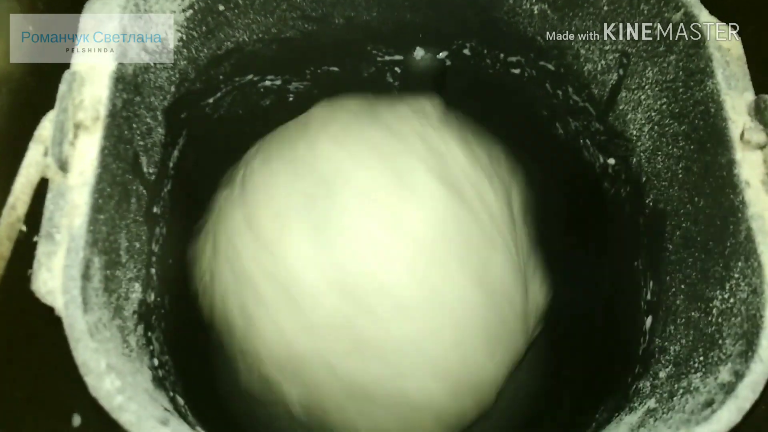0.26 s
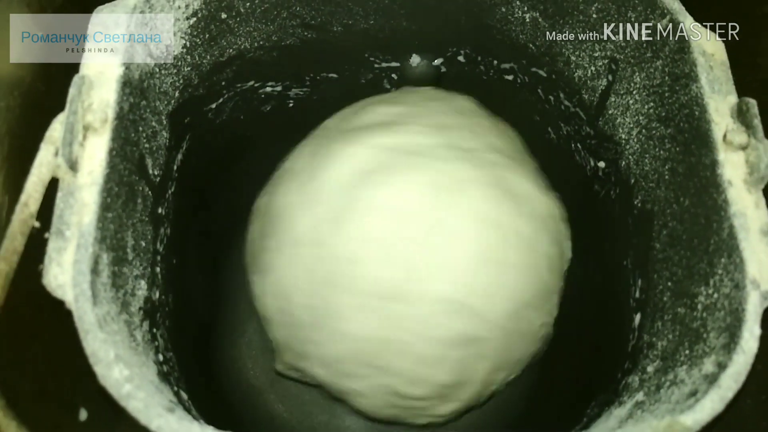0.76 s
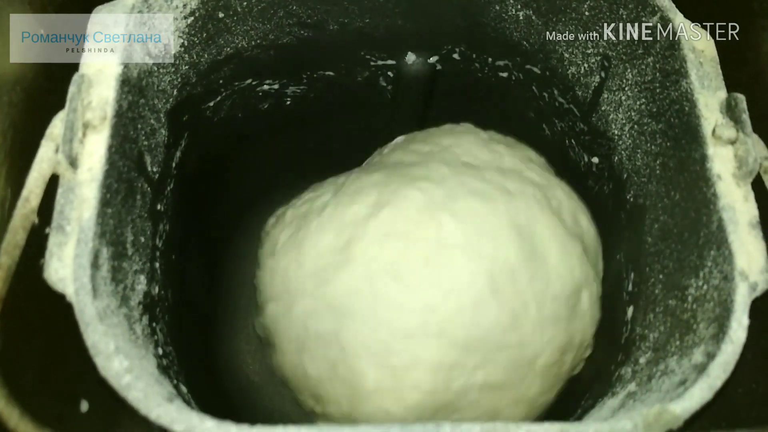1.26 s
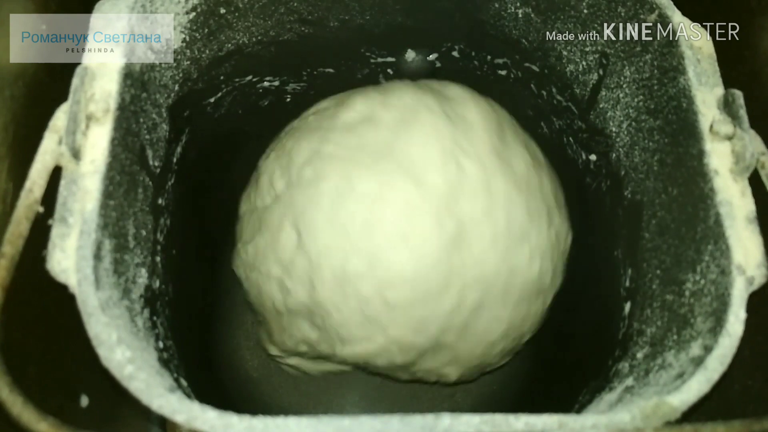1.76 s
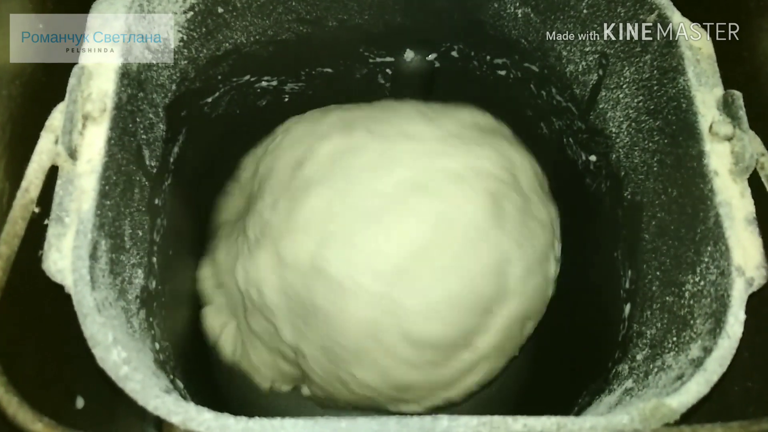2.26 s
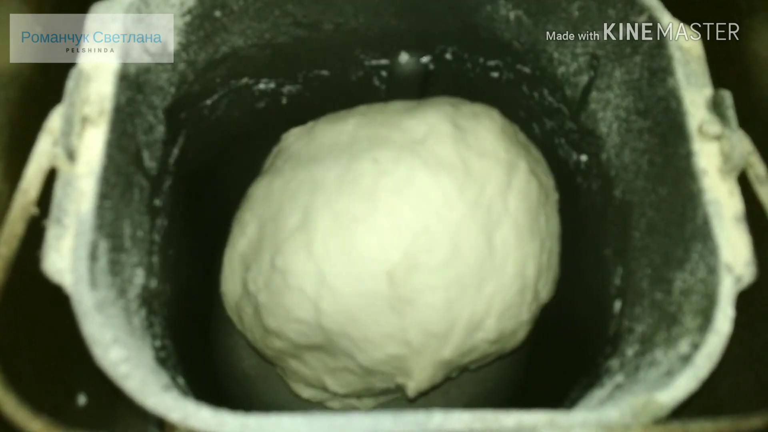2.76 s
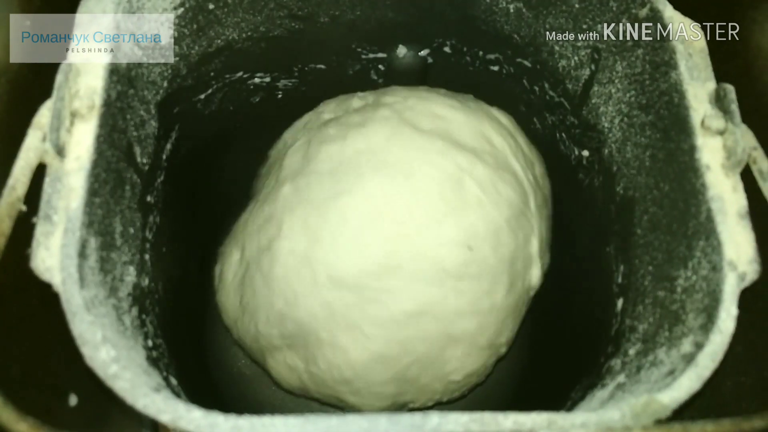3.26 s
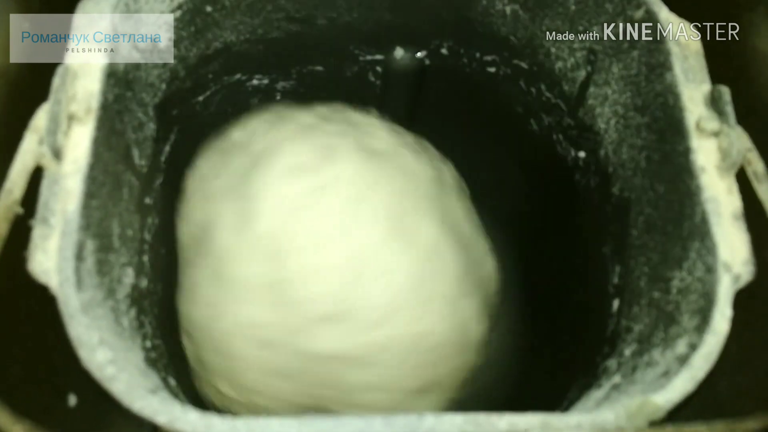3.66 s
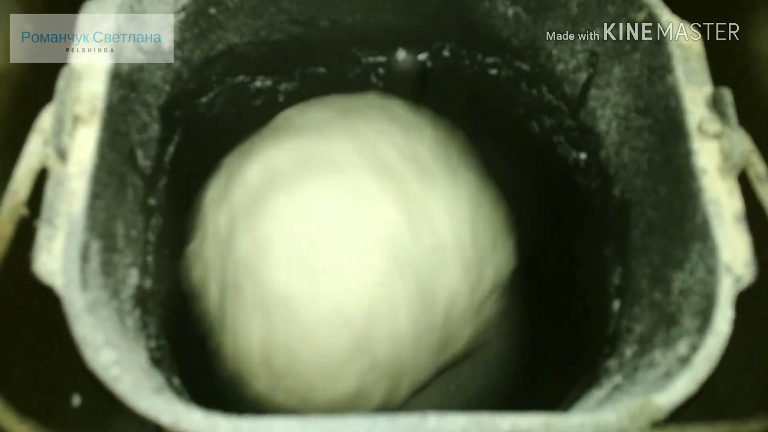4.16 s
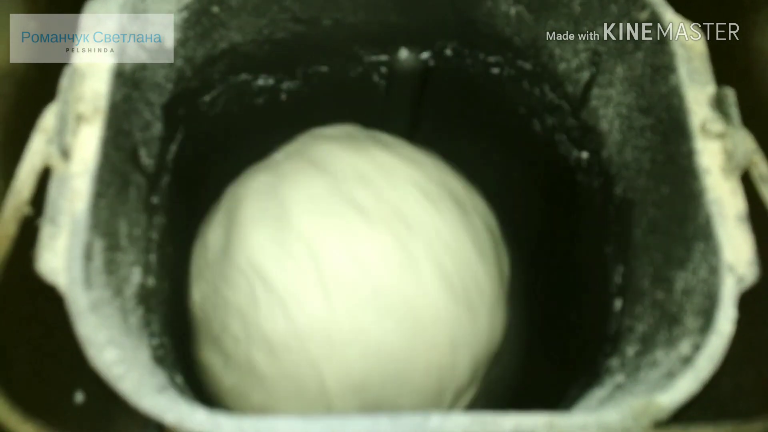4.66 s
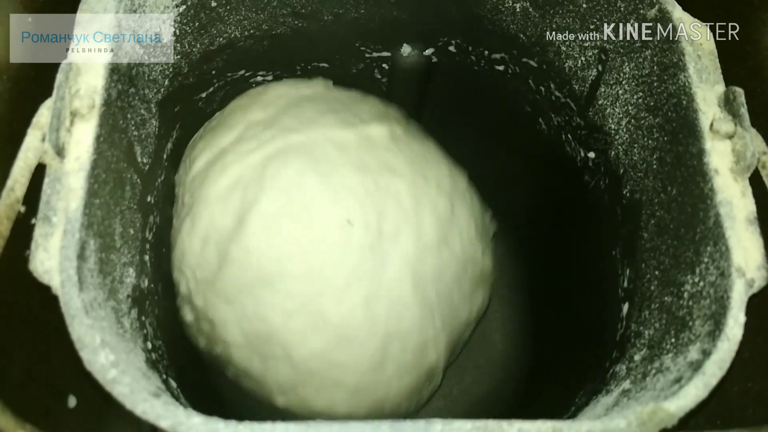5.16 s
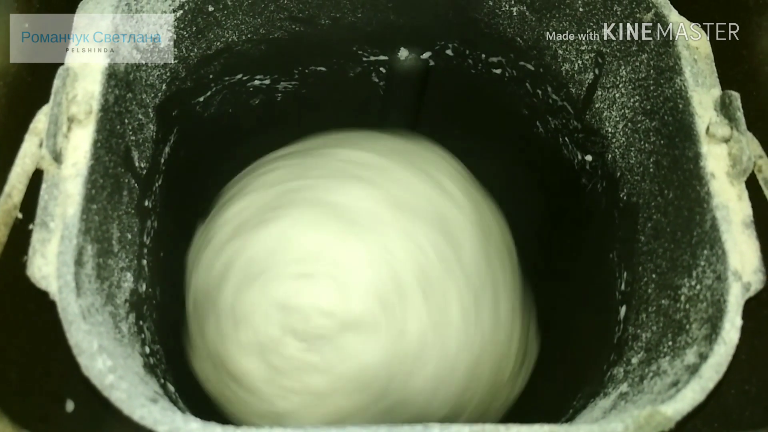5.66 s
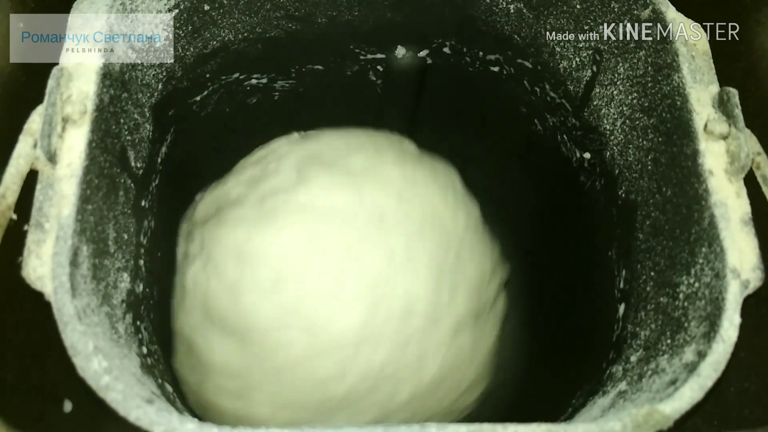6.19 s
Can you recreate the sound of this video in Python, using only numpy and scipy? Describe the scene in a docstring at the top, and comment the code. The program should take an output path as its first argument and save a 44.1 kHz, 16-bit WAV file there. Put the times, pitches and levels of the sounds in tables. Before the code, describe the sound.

A bread machine kneads dough for about six and a half seconds, heard just above its open pan in a small room. A low electric hum and drone run throughout over a faint rush of air, swelling and sagging a few times a second as the paddle pushes. The sticky ball rubs, crackles faintly and slaps softly against the metal wall, with a boomy rumble from the housing and short squeaks from the drive. At about 0.7 seconds comes a cluster of paddle clinks and dull knocks, with more knocks around 1 second. Between 2.1 and 3.4 seconds the tumbling eases three times while the motor hums on. The paddle clinks again at 3.5 seconds. From 4 seconds to the end it is busier: the pan thuds irregularly in its seat, with wet slaps, ticks, brief chirps and stronger motor surges.

```python
"""A motor hum swells and sags: a bread machine kneads dough, heard above its open pan in a small room.
Each push of the paddle loads the mains motor; belt and drive excite the resonances of the housing.
The drive chirps by stick-slip, the pan knocks in its seat and the loose paddle clinks on its shaft.
Between pushes the sticky ball slaps the wall, peels and slips along it; three times it lies still."""
import sys
import numpy as np
from scipy import signal
from scipy.fft import rfft, irfft, next_fast_len
from scipy.io import wavfile

SR = 44100
rng = np.random.default_rng(int(sys.argv[2]) if len(sys.argv) > 2 else 0)


def wav_out(sig):
    """Save sig, one row per channel (or a flat mono array), as 16-bit PCM at SR to the path in sys.argv[1]."""
    wavfile.write(sys.argv[1], SR, np.round(np.clip(np.atleast_2d(sig).T, -1, 1) * 32767).astype(np.int16))


N = 283563
TIME = np.arange(N) / SR
SLOW_TIME = TIME[::40]


def from_db(db):
    """Amplitude ratio of a level in decibels."""
    return 10 ** (np.asarray(db) / 20)


def rms_one(x):
    """Normalisation to unit power."""
    return x / np.sqrt(np.mean(x ** 2) + 1e-20)


def lasting(x, length_s):
    """Normalisation to the energy of unit power held for length_s."""
    return x / np.sqrt(np.sum(x ** 2) / (length_s * SR) + 1e-20)


def balance(left_db):
    """Level difference: two channel gains, the left higher by left_db."""
    return from_db(np.array([[.5], [-.5]]) * left_db)


def spread(left, right, alike):
    """Partial coherence: two independent sounds mix into a stereo pair of correlation alike."""
    mid = np.sqrt(1 + alike) * (left + right)
    side = np.sqrt(1 - alike) * (left - right)
    return (mid + side * [[1], [-1]]) / 2


def add(track, s, sound):
    """Superposition of a short sound on a track, from s seconds."""
    i = max(round(s * SR), 0)
    track[..., i:i + sound.shape[-1]] += sound[..., :max(N - i, 0)]


def swell(s, rise_s, fall_s):
    """Gaussian envelope on SLOW_TIME, peaking at 1 at s seconds."""
    age = SLOW_TIME - s
    return np.exp(-(age / np.where(age < 0, rise_s, fall_s)) ** 2)


def drift(rate_hz):
    """Random modulation: noise of rms 1, low-passed at rate_hz."""
    r = np.exp(-40 * np.pi * rate_hz / SR)
    slow = signal.lfilter([1], [1, -2 * r, r * r], rng.standard_normal(N // 20 + 4002))[4000:]
    return np.interp(np.arange(N) / 20, np.arange(len(slow)), rms_one(slow))


def grains(per_s, spread_db):
    """Shot noise: tiny contacts at random moments, of uneven size and either sign."""
    sizes = from_db(spread_db * np.minimum(rng.exponential(1, N), 4)) * rng.choice([-1, 1], N)
    return rms_one(sizes * (rng.random(N) < per_s / SR))


def tone(hz, lead=0):
    """Phase as the integral of frequency: a sine of rms 1, ahead on the left by lead radians."""
    cycles = np.cumsum(hz + np.zeros(N)) / SR + rng.random()
    return np.sqrt(2) * np.sin(2 * np.pi * cycles + lead * np.array([[.5], [-.5]]))


def resonate(x, hz, width_hz):
    """Damped resonator with unit gain at its peak."""
    r = np.exp(-np.pi * width_hz / SR)
    feedback = [1, -2 * r * np.cos(2 * np.pi * hz / SR), r * r]
    return signal.lfilter(np.array([1, 0, -1]) * (1 - r * r) / 2, feedback, x + 1e-18)


def sing(force, hz, width_hz):
    """Time-varying resonator: steep-sided, its frequency free to move while it rings."""
    turn = np.exp(2j * np.pi * np.cumsum(hz) / SR)
    poles = np.exp(-np.pi * width_hz * np.array([1, 4]) / SR)
    return np.real(turn * signal.lfilter([1], np.poly(poles), force / turn))


def colour(x, spectrum):
    """Spectral shaping to rms 1, rolling off below the spectrum's first point."""
    hz, db = np.transpose(spectrum)
    size = next_fast_len(N)
    f = np.arange(size // 2 + 1) * SR / size + 1e-3
    gain = from_db(np.interp(np.log(f), np.log(hz), db)) / (1 + (hz[0] / f) ** 4)
    return rms_one(irfft(rfft(x, size) * gain, size)[..., :N])


# The rush of cooling air. Each row: frequency in Hz, relative spectral density in dB.
AIR_SPECTRUM = [(30, -10), (70, -34), (150, 13), (400, 2), (850, -58), (1250, 7), (2000, -22), (2600, -1),
                (4000, -45), (15000, -45)]

def cooling_air(level_db=-59.5):
    """Broadband flow noise: a soft, steady rush."""
    return from_db(level_db) * colour(spread(*rng.standard_normal((2, N)), alike=0.23), AIR_SPECTRUM)


def room(x, t60_s=0.083, wall_hz=5500):
    """Reverberation: a short, dull, exponential tail of reflections, different at each ear."""
    t = np.arange(SR // 2) / SR
    tail = rng.standard_normal((2, len(t))) * from_db(-60 * t / t60_s) * (t > .003)
    tail = signal.sosfilt(signal.butter(1, wall_hz, fs=SR, output="sos"), tail)
    return signal.fftconvolve(x, tail / np.sqrt(np.sum(tail ** 2) / 2), axes=1)[:, :N]


# Modes of the housing. Each row: frequency in Hz, bandwidth in Hz, relative gain in dB.
HOUSING_MODES = [(49.6, 8.6, -9.5), (125.5, 2.4, 2.5), (216.3, 12.7, 8), (285.6, 17.8, 6), (328, 73, 0),
                 (415, 46.5, 4.5), (442.6, 37.5, 3.5), (505.2, 40, -1), (653, 38, -9.5), (705, 5.8, -6),
                 (890, 46, -8)]

def housing(force):
    """Modal response of the boomy case, neighbouring modes opposite in sign."""
    return sum((-1) ** k * from_db(db) * resonate(force, hz, width)
               for k, (hz, width, db) in enumerate(HOUSING_MODES))


# Modes of the pan. Each row: frequency in Hz, relative gain in dB, time to decay by 60 dB
# in seconds, excess of left over right in dB.
PAN_MODES = [(1270, -6.5, 0.016, -23), (1255, -1.5, 0.02, 0), (1551, 2, 0.031, 6), (1677, -5, 0.033, -6),
             (1990, -11, 0.14, 14), (2290, -3.5, 0.035, 16), (2500, -13, 0.02, 17),
             (2690, -13, 0.012, 23.5), (3180, -12.5, 0.056, 32), (3470, -9, 0.18, 6), (4750, -16, 0.12, 21),
             (4980, -13, 0.093, 19), (6310, -5.5, 0.087, 20), (10430, -2.5, 0.025, -16)]

def pan_ring(force):
    """Modal response of the metal pan, damped by the dough inside it."""
    return sum(from_db(db) * balance(left_db) * resonate(force, hz, np.log(1000) / np.pi / t60)
               for hz, db, t60, left_db in PAN_MODES)


def drive_rumble(rumble_db, boom_db=4.0, lump_db=1.5, top_hz=750):
    """Structure-borne sound: belt teeth and bearings jolt the case, which shuts in their treble."""
    force = spread(grains(1000, 1.0), grains(1000, 3.7), alike=0.94) * from_db(lump_db * drift(28))
    boom = signal.sosfilt(signal.cheby1(6, .5, top_hz, fs=SR, output="sos"), housing(force))
    return from_db(rumble_db + boom_db) * rms_one(boom) * balance(-1.9)


# Chirps of the drive. Each row: centre in seconds, pitch in Hz, level in dB before the trim,
# length in seconds.
DRIVE_CHIRPS = [(0.351, 1276, -46, 0.034), (0.765, 1830, -56, 0.14), (1.006, 1200, -55, .03),
                (2.53, 1233, -46, 0.036), (3.125, 1250, -48.5, 0.03), (3.555, 1970, -48, 0.067),
                (4.023, 1200, -48, 0.048), (4.14, 1280, -47, 0.017), (4.315, 1230, -47, 0.025),
                (4.395, 1180, -47, 0.041), (4.453, 1240, -44.5, 0.027), (4.573, 1400, -49.5, .05),
                (4.788, 1260, -52.5, 0.044), (5.208, 1545, -50, 0.03), (5.394, 1370, -45, 0.012),
                (5.621, 2450, -52, 0.06), (5.88, 1512, -45, 0.053)]

def drive_chirps(width_hz=100, slips_per_s=900, glide=0.035, rasp_db=-11.5, trim_db=-3.9):
    """Stick-slip friction excites a resonance that bends up or down; the pan rasps along."""
    out, t = np.zeros((2, N)), np.arange(-SR // 12, SR // 12) / SR
    ring_delay_s = 1 / (np.pi * width_hz)
    for s, hz, db, length_s in DRIVE_CHIRPS:
        slips = rng.standard_normal(len(t)) * ((rng.random(len(t)) < slips_per_s / SR) + 0.29)
        slips *= np.exp(-2 * (2 * t / length_s) ** 2)
        bend = glide * rng.uniform(-1.9, 1) * np.tanh(2 * t / length_s)
        song = lasting(sing(slips, hz * (1 + bend), width_hz), length_s / 2)
        rasp = lasting(pan_ring(resonate(slips, hz, hz)), length_s)
        add(out, s + t[0] - ring_delay_s, from_db(db + trim_db) * (song + from_db(rasp_db) * rasp))
    return out * balance(-1.2)


# The paddle pushes the ball round. Each row: peak in seconds, rise of the buzz in seconds,
# added buzz in dB, rotor load in dB.
PADDLE_PUSHES = [(-0.004, 0.016, -40, -36), (0.141, 0.052, -38.5, -42), (0.308, 0.059, -39, -37.5),
                 (0.445, 0.038, -39, -41), (0.57, 0.067, -39.5, -37.5), (0.73, 0.037, -37, -41),
                 (0.888, 0.06, -39, -37), (1.059, 0.089, -40, -42.5), (1.366, 0.055, -35.5, -40),
                 (1.656, 0.024, -35, -42), (1.749, 0.069, -40.5, -38), (2.07, 0.075, -38, -41),
                 (2.512, 0.07, -40.5, -41.5), (3.068, 0.062, -39.5, -41), (3.584, 0.077, -38, -36.5),
                 (3.946, 0.054, -39, -36), (4.089, 0.057, -46, -42.5), (4.233, 0.063, -39.5, -39),
                 (4.367, 0.051, -47, -52), (4.561, 0.05, -37, -33), (4.891, 0.046, -34.5, -35),
                 (5.202, 0.043, -33.5, -35), (5.545, 0.038, -35.5, -34), (5.641, 0.014, -40, -53.5),
                 (5.865, 0.063, -37.5, -32.5), (6.14, 0.048, -38.5, -37), (6.433, 0.024, -35, -36)]

def paddle_pushes(release_ratio=1.98, load_stretch=1.29):
    """Superposed pushes give envelopes of mains buzz and rotor load, slower to fade than to build."""
    buzz, load = 0, 0
    for s, rise_s, buzz_db, load_db in PADDLE_PUSHES:
        fall_s = release_ratio * rise_s
        buzz += from_db(buzz_db) * swell(s, rise_s, fall_s)
        load += from_db(load_db) * swell(s, load_stretch * rise_s, load_stretch * fall_s)
    return np.interp(TIME, SLOW_TIME, buzz), np.interp(TIME, SLOW_TIME, load)


# The throb of the belt. Each row: time in seconds, level in dB before the trim.
BELT_LEVELS = [(0.0, -59), (0.2, -39), (0.32, -64), (0.48, -48), (0.66, -49), (0.85, -44), (1.2, -53),
               (2.1, -57), (2.3, -67), (3.35, -76), (3.67, -52), (4.2, -58), (4.35, -60), (5.2, -57),
               (6.43, -60)]
# Harmonics of the mains buzz. Each row: multiple of the buzz frequency, level in dB.
MAINS_HARMONICS = [(3, -51), (4, -71.5), (5, -69.5), (6, -69.5), (7, -73), (13, -79), (19, -83)]
# Overtones of the rotor. Each row: multiple of the drone frequency, level in dB relative to the load.
ROTOR_OVERTONES = [(3 / 2, -22), (2, -18.5)]
# The ball lets go of the paddle. Each row: time in seconds, dip of the drone in dB,
# half length in seconds.
RELEASES = [(0.394, 9, 0.017), (0.658, 11.5, 0.019), (0.787, 5.5, 0.031), (0.971, 16.5, .018),
            (1.168, 16, 0.029), (1.44, 14, 0.03), (1.84, 7, 0.034), (2.154, 4.5, 0.029), (2.582, 13, 0.024),
            (2.786, 1.5, 0.05), (3.154, 8, 0.025), (3.76, 6, 0.016), (3.832, 4.5, 0.012),
            (4.017, 8.5, 0.025), (4.144, 9.5, 0.017), (4.335, 7.5, 0.024), (4.624, 4, 0.016),
            (4.754, 12, 0.026), (5.086, 11, 0.027), (5.43, 3.5, 0.038), (5.714, 7.5, .025),
            (6.336, 3, 0.029)]
BUZZ_HZ, BELT_HZ, IDLE_BUZZ_DB, IDLE_DRONE_DB = 100, 150.8, -53, -44
IDLE_HZ, SAG_HZ, FULL_LOAD_DB, SAG_LAG_S = 198.9, 5.5, -33, 0.029  # the drone: four cycles a turn

def motor(push_buzz, load, trim_db=-2.0, race_hz_per_db=0.3, waver_hz=0.6,
          flutter_db=1.5, shake_db=-2.5, throb_db=1.66):
    """Forced vibration: the buzz is locked to the mains; under load the rotor slows and drones louder."""
    effort = np.interp(TIME - SAG_LAG_S, TIME, load) / from_db(FULL_LOAD_DB)
    unrest = np.minimum(0.16 + 2 * effort, 1)  # unloaded, the motor runs almost evenly
    dip_db = np.interp(TIME, SLOW_TIME, sum(db * swell(s, half_s, half_s) for s, db, half_s in RELEASES))
    race_hz = race_hz_per_db * dip_db  # freed of the ball, the rotor runs a little faster
    drone_hz = IDLE_HZ - SAG_HZ * effort + race_hz + waver_hz * unrest * drift(25.0)
    buzz_gain = (from_db(IDLE_BUZZ_DB) + push_buzz) * from_db(flutter_db * unrest * drift(23))
    buzz = buzz_gain * tone(BUZZ_HZ, lead=0.43 + 0.12 * drift(5.4))
    harmonics = sum(from_db(db + shake_db * unrest * drift(4.3)) * tone(k * BUZZ_HZ)
                    for k, db in MAINS_HARMONICS)
    drone_gain = from_db(IDLE_DRONE_DB) + from_db(trim_db) * load
    drone_gain *= from_db(throb_db * unrest * drift(7.4) - dip_db)
    drone = drone_gain * tone(drone_hz, lead=-.15 + 0.43 * drift(4.2))
    growl = sum(load * from_db(db + 3.1 * drift(29)) * tone(k * drone_hz) for k, db in ROTOR_OVERTONES)
    belt_db = np.interp(TIME, *np.transpose(BELT_LEVELS)) + trim_db + 3.4 * drift(2.5)
    belt = from_db(belt_db) * tone(BELT_HZ + 2.3 * drift(16.0))
    return (buzz + drone) * balance(0.95) + (harmonics + growl + belt) * balance(0.033)


# The pan knocks in its seat. Each row: start in seconds, level in dB before the trim, pitch in Hz.
PAN_KNOCKS = [(0.738, -34, 514), (0.772, -37, 409), (0.989, -38, 398), (1.048, -39, 487), (1.601, -37, 466),
              (2.442, -36, 436), (3.505, -39, 380), (3.541, -35, 409), (4.074, -30, 482), (4.158, -40, 396),
              (4.309, -33.5, 452), (4.714, -33, 409), (4.77, -33, 415), (4.837, -31, 398),
              (5.034, -32, 490), (5.2, -37.5, 455), (5.4, -34.5, 406), (5.726, -31.5, 409),
              (5.809, -31.5, 398), (6.13, -34, 444), (6.281, -35.5, 463)]

def pan_knocks(trim_db=-1.5, squash_s=0.0017, boom_db=-3.0):
    """Soft impact: the ball rocks the pan, giving a thud of a few cycles; the housing booms after it."""
    out, t = np.zeros(N), np.arange(SR // 10) / SR
    for s, db, hz in PAN_KNOCKS:
        thud = t ** 2 * np.exp(-t / squash_s) * np.sin(2 * np.pi * hz * t) / squash_s ** 2
        add(out, s, from_db(db + trim_db) * lasting(thud + from_db(boom_db) * housing(thud), 0.0042))
    return out * balance(-2.0)


# Modes of the paddle hitting its shaft. Each row: frequency in Hz, bandwidth in Hz, relative gain in dB.
CLINK_MODES = [(1910, 36, 16.5), (2430, 126, 6), (2800, 60, 5), (3540, 77, 3), (4658, 67, 7), (4860, 47, 1),
               (5940, 47, -7.5), (6310, 50, 7.5), (8000, 44, 7.5), (9150, 45, -5), (9700, 130, 9),
               (11020, 69, 13.5), (12100, 130, 12)]
# Contacts of pan, paddle and dough. Each row: start in seconds, relative level in dB, spectral centre
# in Hz, share of metal contact from 0 to 1, decay time in seconds.
CONTACTS = [(0.311, -33.5, 4620, 1, 0.0027), (0.571, -36, 4200, 0.8, 0.0046),
            (0.689, -28, 5300, 0.9, 0.0036), (0.701, -16, 9850, 0.1, 0.0041),
            (0.702, -25, 2230, 0.3, 0.0041), (0.718, -32, 3500, 0.6, 0.0022), (0.72, -27, 4700, 1, 0.0021),
            (0.728, -27, 6040, 0.9, 0.0025), (0.734, -14.5, 4340, 1, 0.00074),
            (0.735, -26, 10000, 0.6, 0.0057), (0.741, -30, 3480, 0.8, 0.0015),
            (0.743, -25.5, 1910, 0.84, 0.0018), (0.991, -35, 2560, 0.1, .002), (1, -39, 1700, 0, .003),
            (1.044, -37, 1800, 0, .003), (1.317, -41, 2690, 0, 0.0018), (1.581, -27, 9100, 0, 0.0029),
            (1.607, -39, 2270, 0.1, .003), (1.803, -44, 2713, 0.25, 0.0021),
            (1.816, -37.5, 2200, 0.53, 0.0022), (2.129, -31.5, 2520, 0, 0.0041),
            (2.363, -18.5, 11100, 0.43, 0.0016), (2.359, -42, 2880, 0.3, .002),
            (2.389, -36, 2400, 0, 0.0036), (2.444, -39, 1700, 0, .003), (2.652, -37.5, 2270, 0.02, 0.0043),
            (3.048, -39, 1702, 0.02, .003), (3.099, -43, 2910, 0.2, .003), (3.326, -42, 1966, 0, 0.002),
            (3.391, -27, 9650, 0.15, 0.0055), (3.479, -36, 4570, 0.98, 0.0033),
            (3.491, -29.5, 3800, 0.9, 0.0043), (3.495, -32, 4784, 1, 0.0033), (3.502, -30, 4360, 1, 0.0041),
            (3.503, -25.5, 11500, 0.33, 0.0036), (3.514, -33, 3420, 0.7, 0.0033),
            (3.541, -47, 1920, 0.84, 0.0018), (3.56, -41, 3500, 1, 0.0033),
            (3.575, -34, 2400, 0.54, 0.0036), (3.597, -36, 4800, 1, 0.0043),
            (3.719, -37.5, 2730, 0.27, 0.0027), (3.848, -42, 4300, 0.6, 0.004),
            (4.061, -38, 2000, 0.04, 0.0021), (4.076, -36, 3000, 0.1, 0.0024),
            (4.272, -33, 10060, 0.3, 0.0032), (4.31, -40, 2600, 0.34, .003),
            (4.515, -39.5, 2516, 0.12, 0.0027), (4.739, -33.5, 1906, 0.22, .002),
            (4.77, -33, 8000, 0.1, 0.0018), (4.771, -37, 2310, 0.07, 0.0045),
            (4.836, -35, 2800, 0.26, 0.004), (4.841, -37, 2530, 0.1, 0.0038), (5.09, -33, 5990, 0.6, 0.004),
            (5.13, -25, 10900, 0, 0.0046), (5.372, -37, 3350, 0.01, .003),
            (5.385, -31.5, 3460, 0.02, 0.0032), (5.388, -27, 9300, 0, 0.0037),
            (5.719, -45, 2006, 0, 0.0027), (5.811, -34.5, 2530, 0, 0.0044), (5.979, -42, 2566, 0.1, 0.0026),
            (6.132, -38, 1785, 0, 0.0031)]

def contact_ticks(crack_db=-12.0, ring_db=-5.0, clink_db=-3.5, first_db=-1.0, scuff_db=-13.0,
                  cracks_per_s=3000, band_ratio=1.24, metal_takes=0.57):
    """Impulse excitation: a crack and a volley ring the pan, and the paddle where metal meets metal."""
    on_pan, on_metal, t = np.zeros((2, N)), np.zeros((2, N)), np.arange(SR // 20) / SR
    for s, db, hz, metal, decay_s in CONTACTS:
        cracks = (rng.random(len(t)) < cracks_per_s / SR) + from_db(scuff_db)
        volley = spread(*rng.standard_normal((2, len(t))), alike=0.32) * cracks * np.exp(-t / decay_s)
        volley[:, 0] += from_db(first_db)
        band = signal.butter(1, [hz / band_ratio, hz * band_ratio], "band", fs=SR, output="sos")
        force = from_db(db) * lasting(signal.sosfilt(band, volley), decay_s)
        add(on_pan, s, (1 - metal_takes * metal) * force)
        add(on_metal, s, metal * force)
    tick = from_db(crack_db) * on_pan + from_db(ring_db) * pan_ring(on_pan)
    clink = sum(from_db(db) * resonate(on_metal, hz, width) for hz, width, db in CLINK_MODES)
    return tick * balance(-0.57) + from_db(clink_db) * clink * balance(5.9)


# The ball peels off the wall and slides on. Each row: peak in seconds, rise in seconds,
# then relative levels of crackle, rubbing and drive rumble in dB.
BALL_SLIPS = [(0.039, 0.033, -54, -56, -53), (0.192, 0.05, -54, -53.5, -53), (0.318, 0.11, -84, -60, -63),
              (0.477, 0.024, -54, -53.5, -67), (0.602, 0.052, -63, -50.5, -49),
              (0.738, 0.057, -51, -52, -49.5), (0.877, 0.039, -72, -52.5, -52.5),
              (1.036, 0.069, -62, -56.5, -60), (1.189, 0.17, -64, -98, -73),
              (1.327, 0.069, -89, -50, -52.5), (1.43, 0.096, -57.5, -101, -73),
              (1.613, 0.022, -57, -50, -53), (1.735, 0.099, -54.5, -58, -53),
              (1.965, 0.045, -55, -57.5, -71), (2.101, 0.079, -67, -60, -52),
              (2.423, 0.062, -55, -54.5, -82), (2.528, 0.057, -55, -55.5, -54.5),
              (2.67, 0.03, -84, -77, -45), (2.932, 0.052, -53, -71, -95), (3.071, 0.088, -53, -54, -51.5),
              (3.427, 0.095, -55, -65, -89), (3.536, 0.086, -55.5, -56, -51),
              (3.709, 0.042, -57, -60, -48.5), (3.821, 0.05, -52, -56, -70), (3.95, 0.068, -61, -62, -69),
              (4.13, 0.061, -55.5, -55, -49.5), (4.311, 0.066, -62, -54, -57), (4.42, 0.035, -48, -61, -65),
              (4.653, 0.022, -49.5, -66, -72), (4.739, 0.058, -49.5, -54, -55),
              (4.892, 0.042, -70, -57.5, -48), (5.069, 0.073, -49.5, -54, -51),
              (5.219, 0.04, -60, -55, -54), (5.412, 0.051, -48.5, -57, -49),
              (5.551, 0.042, -58.5, -52, -52.5), (5.712, 0.078, -49.5, -56, -56.5),
              (5.998, 0.059, -52, -55, -70), (6.138, 0.049, -62, -56.5, -83),
              (6.308, 0.044, -48, -54.5, -53), (6.401, 0.045, -63, -51, -50)]
# The ball lies still over the spinning paddle. Each row: start and end in seconds, depth from 0 to 1.
BALL_RESTS = [(2.132, 2.352, 0.36), (2.562, 2.903, 0.43), (3.134, 3.403, 0.35)]
# Crackle, rubbing and rumble in turn. Each row: relative level while the ball rolls in dB,
# loss in dB for a rest of depth 1.
ROLLING_LEVELS = [(-58, 20), (-63, 17), (-50.5, 15.5)]

def tumbling(slide_ratio=1.16, settle_s=0.075, catch_s=0.016):
    """Level envelopes in dB of crackle, rubbing and rumble: raised by each slip, lowered by each rest."""
    slips = sum(np.outer(from_db(levels_db), swell(s, rise_s, slide_ratio * rise_s))
                for s, rise_s, *levels_db in BALL_SLIPS)
    resting = 0
    for start, end, depth in BALL_RESTS:
        settled = np.clip((SLOW_TIME - start) / settle_s, 0, 1)
        resting += depth * settled * np.clip((end - SLOW_TIME) / catch_s, 0, 1)
    return [np.interp(TIME, SLOW_TIME, 20 * np.log10(from_db(roll_db) + slip) - rest_db * resting)
            for slip, (roll_db, rest_db) in zip(slips, ROLLING_LEVELS)]


# Spectra of rubbing and of peeling dough. Each row: frequency in Hz, relative spectral density in dB.
RUB_SPECTRUM = [(600, 15.5), (830, 3.5), (1020, 8), (1220, 11), (1450, -0.5), (2050, -5), (2600, 0.5),
                (3400, -9), (4000, -40), (4800, -2), (8000, -48)]
PEEL_SPECTRUM = [(1500, 1), (3000, -2), (4200, -3.5), (4700, 0.5), (5550, -1.5), (6400, -0.5), (7400, 0.5),
                 (9000, 3.5), (11300, 8.5), (12800, 5), (15000, -3)]

def dough_sliding(rub_db, crackle_db, rub_trim_db=-3.5, crackle_trim_db=0.16,
                  clump_db=3.5, snap_db=-10.5):
    """Friction and adhesion: the slipping ball rings the pan; its skin peels in crackle and snaps."""
    clumps = from_db(clump_db * drift(22.3))
    slips = clumps * spread(grains(1800, 2.3), grains(1800, 0.27), alike=0.51)
    rub = from_db(rub_db + rub_trim_db) * rms_one(colour(slips, RUB_SPECTRUM) + rms_one(pan_ring(slips)))
    snaps = from_db(snap_db) * spread(grains(160, 7.0), grains(160, 2.4), alike=0.054)
    peel = np.sqrt(clumps) * (np.array([grains(13000, 3.3), grains(13000, 2.4)]) + snaps)
    crackle = from_db(crackle_db + crackle_trim_db) * colour(peel, PEEL_SPECTRUM)
    return rub * balance(2.4) + crackle * balance(-0.059)


def dough_smacks(level_db, trim_db=-9.5, spread_db=3.5, low_hz=1000, high_hz=4200,
                 sharpness=3.2, decay_s=0.0014, count=600):
    """Adhesive failure: sticky spots tear off in small dull smacks, each with its own pitch and side."""
    out, t = np.zeros((2, N)), np.arange(SR // 50) / SR
    for when, shade, size, side in rng.random((count, 4)):
        hz = low_hz * (high_hz / low_hz) ** shade
        tear = rng.standard_normal(len(t)) * np.exp(-t / decay_s)
        smack = lasting(sing(tear, np.full(len(t), hz), hz / sharpness), decay_s)
        gain = from_db(spread_db * min(-np.log(size), 3))
        add(out, when * N / SR, gain * smack * balance(12 * (side - .5)))
    return from_db(level_db + trim_db) * rms_one(out)


# The ball slaps the wall. Each row: start in seconds, relative level in dB, initial cavity pitch in Hz.
WALL_SLAPS = [(0.096, -45.5, 920), (0.706, -40, 835), (0.988, -39, 1610), (1.044, -49, 1250),
              (1.095, -45, 1190), (1.251, -42.5, 1360), (1.313, -63, 1260), (1.603, -57, 1220),
              (2.653, -50.5, 930), (3.05, -44, 1273), (3.49, -49, 1300), (3.541, -45, 800),
              (3.614, -48, 1140), (3.72, -47, 1344), (3.798, -46, 1077), (3.927, -43, 1190),
              (4.082, -44, 1190), (4.306, -35.5, 1131), (4.52, -43.5, 1540), (4.741, -51, 1270),
              (4.769, -53, 1140), (4.836, -43.5, 1140), (5.025, -48, 1146), (5.093, -42.5, 1320),
              (5.385, -38.5, 1216), (5.405, -45, 900), (5.72, -45.5, 950), (5.809, -46, 890),
              (6.13, -46, 1106), (6.341, -46, 1174)]

def dough_slaps(soft_s=0.0051, width_hz=200, glide_per_s=1.2, ring_db=-0.5, energy_s=0.00059):
    """Cavity resonance: the hollow between ball and wall drops in pitch as the dough spreads."""
    out, t = np.zeros((2, N)), np.arange(SR // 10) / SR
    for s, db, hz in WALL_SLAPS:
        push = rng.standard_normal(len(t)) * np.sqrt(t) * np.exp(-t / soft_s)
        hollow = lasting(sing(push, hz * np.exp(-glide_per_s * t), width_hz), energy_s)
        dull_push = signal.sosfilt(signal.butter(4, 1.56 * hz, fs=SR, output="sos"), push)
        ring = lasting(pan_ring(dull_push), 2 * energy_s)
        add(out, s, from_db(db) * (hollow + from_db(ring_db) * ring))
    return out * balance(-0.34)


def scene(room_db=-3.5):
    """Superposition of air, machine and dough; the dough, chirps and ticks also reverberate."""
    crackle_db, rub_db, rumble_db = tumbling()
    dough = dough_sliding(rub_db, crackle_db) + dough_smacks((rub_db + crackle_db) / 2) + dough_slaps()
    contacts = dough + drive_chirps() + contact_ticks()
    air = cooling_air()
    machine = motor(*paddle_pushes()) + drive_rumble(rumble_db) + pan_knocks()
    return air + machine + contacts + from_db(room_db) * room(contacts)


def record(dry, cutoff_hz=15450):
    """Band limiting: a steep low-pass cuts the highest treble."""
    return signal.sosfilt(signal.ellip(10, .2, 80, cutoff_hz, fs=SR, output="sos"), dry)


dry = scene()
out = record(dry)
wav_out(out)
```